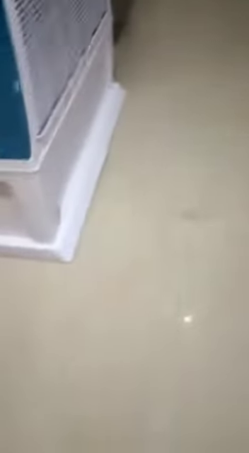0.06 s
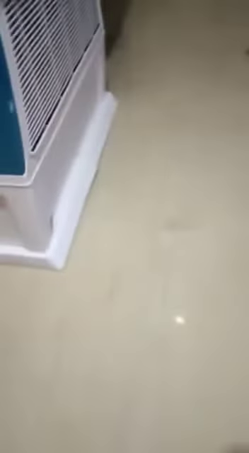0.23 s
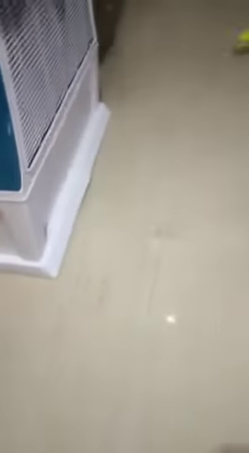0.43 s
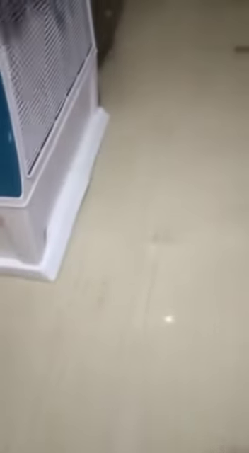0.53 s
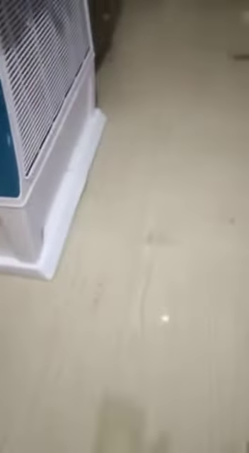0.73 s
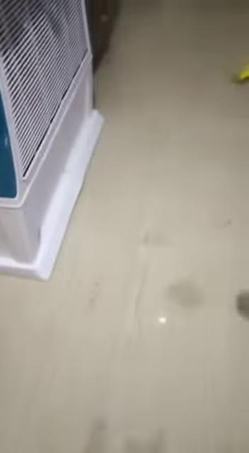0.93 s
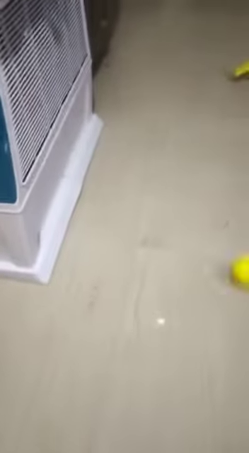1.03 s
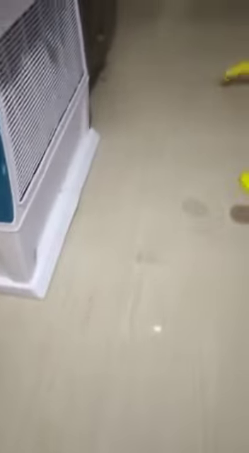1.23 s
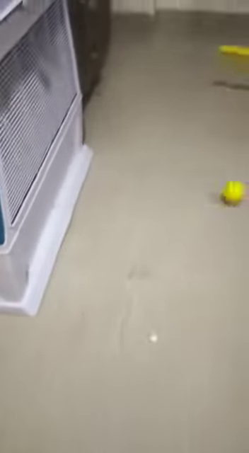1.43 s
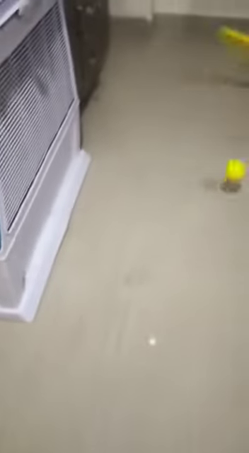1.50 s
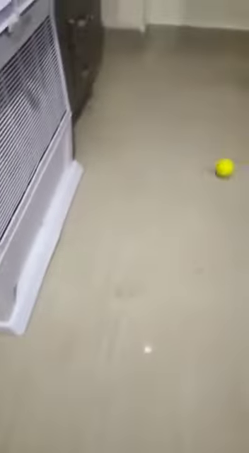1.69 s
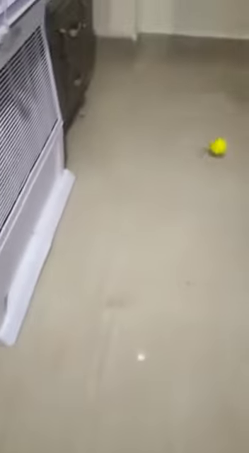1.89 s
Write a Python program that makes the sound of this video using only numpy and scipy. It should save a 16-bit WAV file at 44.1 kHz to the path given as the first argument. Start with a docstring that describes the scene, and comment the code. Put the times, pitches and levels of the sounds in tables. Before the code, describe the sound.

A ball is knocked loudly at about 0.2 and 0.9 seconds, each a sharp crack with a hollow boom ringing briefly in a bare room. A faint rustle and thin, high squeak come just before the second knock. A bright scuff and small ticks follow around 1.1 seconds. The ball bounces on the hard floor at 1.5 and 1.8 seconds, softer each time, over low room noise.

```python
"""Ball knocks in a bare room

A ball is knocked twice, loud and hollow, then bounces away twice on the hard floor. Each knock is a
crack and a short boom that the room holds; a limiter flattens its start. Between the knocks come
a soft rustle and a thin squeak, after them a bright scuff. Faint ticks sit over low room noise."""
import sys
import numpy as np
from scipy import signal
from scipy.fft import rfft, irfft
from scipy.io import wavfile
from scipy.ndimage import uniform_filter1d

SR = 44100
rng = np.random.default_rng(int(sys.argv[2]) if len(sys.argv) > 2 else 0)


def unload_audio(sound):
    """Save the sound as a 16-bit wav file, at the path given as the first command line argument."""
    columns = np.transpose(np.atleast_2d(sound))
    # keep every value between -1 and 1, then stretch to whole-number steps
    steps = np.round(np.clip(columns, -1, 1) * 32767)
    wavfile.write(sys.argv[1], SR, steps.astype(np.int16))


N = 85995
HZ, T = np.fft.rfftfreq(2 * N, 1 / SR), np.arange(N) / SR
TREBLE_SHELF = HZ ** 2 / (HZ ** 2 + 2500 ** 2)

# colour of the room tone: freq_hz, gain_db
ROOM_TONE_EQ = [(25, -20), (50, -23.5), (90, -7), (200, -7.5), (370, -0.5), (600, -11), (1200, -14),
                (2200, -22.5), (5000, -32), (10000, -34), (15500, -36.5)]
# how alike left and right are in the room: freq_hz, correlation
ROOM_CORRELATION = [(100, 0.78), (300, 0.87), (550, 0.36), (1000, -.15), (2500, 0.07), (12000, 0)]
# reverb time by band: freq_hz, t60_s
ROOM_DECAY = [(100, 0.35), (250, 0.71), (500, 0.56), (1500, 0.59), (4000, 0.54), (9000, 0.43),
              (15000, 0.36)]
# the two loud knocks: start_s, crack_gain_db, tail_gain_db, tail_treble_db
KNOCK_HITS = [(0.2080, 4, -0.5, -2.5), (0.8787, 2.5, 1.5, -2)]
# modes of the hollow boom: pitch_hz, gain_db, t60_s
BOOM_MODES = [(369, 4, 0.045), (506, -7.5, 0.03), (864, -16.5, 0.091), (1092, -13.5, 0.035),
              (1178, -21, 0.074), (1470, -8, 0.038), (1760, -41, 0.038), (2470, -45, .04),
              (2890, -18.5, 0.033)]
# colour of the crack: freq_hz, gain_db
CRACK_EQ = [(45, -40), (135, 13), (400, 9), (900, 21.5), (2000, 3), (5000, 1), (9000, -4), (13000, -4),
            (15000, -20), (16500, -26)]
# peaks and hollows shared by a knock's spike, crack and tail: centre_hz, width_hz, gain_db
KNOCK_RESONANCES = [(1183, 150, 4), (1560, 95, 5), (1810, 62, 2.5), (2010, 150, -1.5), (2510, 130, 4.5),
                    (2800, 90, -3.5), (3290, 42, 7), (3460, 75, 0.5), (3700, 130, -3), (4120, 61, -14),
                    (5260, 110, 3), (5330, 86, 2.5), (5700, 200, -7.5), (6140, 40, 9.5), (6440, 83, 8),
                    (6590, 31, 9), (7070, 140, -13), (7400, 200, -0.5), (7860, 170, -10.5), (8760, 320, 8),
                    (9270, 110, -9), (10370, 360, 4.5), (11350, 330, -13.5), (11700, 180, 2.5)]
# colour of the room's answer to a knock: freq_hz, gain_db
TAIL_EQ = [(40, -28), (90, -28), (150, -9.5), (240, -4), (340, 0), (450, -2), (700, -6.5), (1300, -5),
           (2100, -13.5), (3300, -17.5), (5200, -23.5), (7300, -24.5), (9000, -19.5), (12500, -24),
           (14500, -35), (16000, -49)]
# resonances that stand out in that answer: centre_hz, width_hz, gain_db
TAIL_RESONANCES = [(229.5, 14, 8.5), (276.4, 18.5, 6.5), (356.2, 16.4, 8.5), (479.2, 11.8, 7),
                   (584, 56, 5.5), (604, 22, 6.5), (790, 67, 7), (1007, 50, 5), (1747, 11, 8)]
# swell and fade of the rustle: time_s, level_db
RUSTLE_ENVELOPE = [(0.623, -53), (.645, -47), (.68, -51.5), (.77, -54), (.81, -59.5), (0.849, -65)]
# colour of the rustle: freq_hz, gain_db
RUSTLE_EQ = [(200, -9), (800, 10), (2000, 5.5), (3000, 1), (4500, -3), (7000, -14), (10000, -8.5),
             (15000, -31)]
# glide of the squeak: time_s, pitch_hz, level_db
SQUEAK_GLIDE = [(.635, 11400, -74), (.655, 12000, -57), (.678, 13700, -66), (.72, 14000, -62),
                (0.764, 14000, -57), (.787, 15100, -68), (.808, 12900, -57), (.835, 10900, -70)]
# faint ticks and one long scuff: start_s, level_db, pitch_hz, width_octaves, t60_s
TICK_HITS = [(0.638, -28.5, 4800, 1, 0.0071), (0.643, -26, 4780, 0.2, 0.022),
             (1.093, -13.5, 9500, 0.48, 0.44), (1.155, -24, 4700, 0.14, .012),
             (1.1603, -17, 5000, 0.16, 0.012), (1.562, -34.5, 4270, 0.38, 0.011)]
# bounces on the floor: start_s, gain_db, direct_db, treble_db
BOUNCE_HITS = [(1.475, -1.5, 0.5, -4.5), (1.769, -5.5, -8.5, -5.5)]
# colour of a bounce: freq_hz, gain_db
BOUNCE_EQ = [(60, -56), (150, -10.5), (240, -1), (400, -2), (850, -4), (1250, -3), (1900, -15.5),
             (4000, -20.5), (6500, -25), (10000, -17.5), (15500, -34)]
# resonances that stand out in a bounce: centre_hz, width_hz, gain_db
BOUNCE_RESONANCES = [(218.6, 34, 14), (514, 45, 5.5), (865, 44, 13), (1217, 62, 8)]


def amp(db):
    """Decibels to gain."""
    return 10 ** (np.asarray(db) / 20)


def curve(points, hz=HZ):
    """Reads a table on a log-frequency axis."""
    freq_hz, value = np.transpose(points)
    return np.interp(np.log(hz + 1), np.log(freq_hz), value)


def bells(table):
    """EQ curve in dB of a set of resonances."""
    return sum(db / (1 + (2 * (HZ - hz) / width) ** 2) for hz, width, db in table)


def unit(x):
    """Scales to an average energy of 1 per channel."""
    return x / np.sqrt(np.mean(np.sum(x ** 2, -1)) + 1e-20)


def decay(t60_s):
    """Exponential fade, 60 dB down after t60_s."""
    return np.exp(-np.log(1000) * T / t60_s)


def eq(x, gain_db):
    """Minimum-phase EQ: nothing rings ahead of the attack."""
    cepstrum = irfft(np.log(amp(gain_db)))
    cepstrum[1:N] *= 2
    cepstrum[N + 1:] = 0
    return irfft(rfft(x, 2 * N) * np.exp(rfft(cepstrum)))[..., :N]


def diffuse():
    """Noise from all around: alike in both ears only in the bass."""
    a, b = rfft(rng.standard_normal((2, 2 * N)))
    correlation = curve(ROOM_CORRELATION)
    mid, side = a * np.sqrt(1 + correlation), b * np.sqrt(1 - correlation)
    return irfft(np.array([mid + side, mid - side]))[:, :N]


def room_tone(level_db=-50.5):
    """A steady bed of low room noise."""
    return amp(level_db) * np.sqrt(N) * unit(eq(diffuse(), curve(ROOM_TONE_EQ)))


def knock(crack_gain_db, tail_gain_db, tail_treble_db):
    """A spike and a crack with a spray of close echoes, a hollow boom, and the room's long answer."""
    detail_db = bells(KNOCK_RESONANCES) + echo_ripple()
    crack_eq = curve(CRACK_EQ) + detail_db
    crack = unit(eq(diffuse() * decay(t60_s=.016), crack_eq))
    spray = unit(eq(diffuse() * decay(t60_s=.062), crack_eq))
    attack = amp(crack_gain_db) * (amp(2) * crack + amp(15) * spray)
    tail_eq = curve(TAIL_EQ) + bells(TAIL_RESONANCES) + detail_db + tail_treble_db * TREBLE_SHELF
    tail = amp(26.5 + tail_gain_db) * unit(eq(reverb_tail(), tail_eq))
    return amp(2) * (with_reflections(spike()) + attack + boom() + tail)


def spike(bright_hz=11000, top_hz=14000):
    """The hard, bright instant of contact."""
    tilt = (HZ + 50) / np.hypot(HZ, bright_hz) / (1 + (HZ / top_hz) ** 10)
    burst = diffuse() * decay(t60_s=.0045)
    return amp(8.5) * unit(eq(burst, 20 * np.log10(tilt) + bells(KNOCK_RESONANCES)))


def boom(hold_s=.012, left_lag_s=.00023, low_cut_hz=177):
    """The hollow ring: held for a few cycles, then dying fast; it reaches the right ear first."""
    t = np.maximum(T - np.array([[left_lag_s], [0]]), 0)
    dying_s = np.maximum(t - hold_s, 0)
    modes = sum(amp(db - 60 * dying_s / t60) * np.sin(2 * np.pi * hz * t) for hz, db, t60 in BOOM_MODES)
    return signal.sosfilt(signal.butter(4, low_cut_hz, "high", fs=SR, output="sos"), modes)


def echo_ripple(depth=.85, width_hz=75, above_hz=2200):
    """Close echoes interfere: rounded peaks and narrow dips in the treble, in dB."""
    bins = round(width_hz / HZ[1])
    paths = rng.standard_normal((2, len(HZ)))
    smoothed = uniform_filter1d(uniform_filter1d(paths, bins), bins)
    power = (smoothed ** 2).sum(0)
    ripple_db = 10 * np.log10(power / power.mean() + 1e-2)
    return depth * ripple_db * HZ ** 2 / (HZ ** 2 + above_hz ** 2)


def reverb_tail(rise_s=.0016):
    """The bare room rings on, each band dying at its own speed."""
    hz, t, bands = signal.stft(diffuse(), SR, nperseg=512)
    bands *= amp(-60 * t / curve(ROOM_DECAY, hz)[:, None])
    tail = signal.istft(bands, SR)[1][:, :N]
    return tail * (1 - np.exp(-T / rise_s))


def with_reflections(x, count=6, delay_s=(.002, .02), wet_db=-3):
    """Adds a few single echoes from the floor and nearby things."""
    taps = np.zeros((2, N))
    delays = (rng.uniform(*delay_s, (2, count)) * SR).astype(int)
    np.put_along_axis(taps, delays, rng.choice([-1., 1.], delays.shape), 1)
    return x + amp(wet_db) * signal.fftconvolve(x, unit(taps), axes=1)[:, :N]


def rustle():
    """Soft rubbing noise ahead of the second knock."""
    time_s, level_db = np.transpose(RUSTLE_ENVELOPE)
    rubbing = np.sqrt(N) * unit(eq(diffuse(), curve(RUSTLE_EQ)))
    return rubbing * np.interp(T, time_s, amp(level_db), left=0, right=0)


def squeak(width_hz=330, flutter_db=2.5, flutter_step_s=.0068):
    """A fuzzy, very high whistle that rises, holds and drops, broken up by an uneven flutter."""
    time_s, pitch_hz, level_db = np.transpose(SQUEAK_GLIDE)
    fuzz = eq(rng.standard_normal((2, N)), -20 * np.log10(1 + (2 * HZ / width_hz) ** 2))
    phase = 2 * np.pi * np.cumsum(np.interp(T, time_s, pitch_hz)) / SR
    whistle = np.sqrt(N) * unit(fuzz * np.sin(phase))
    steps_s = np.arange(0, N / SR, flutter_step_s)
    flutter = amp(flutter_db * np.interp(T, steps_s, rng.standard_normal(N)[:len(steps_s)]))
    return whistle * flutter * np.interp(T, time_s, amp(level_db), left=0, right=0)


def tick(level_db, pitch_hz, width_octaves, t60_s):
    """A small bright contact with one broad resonance; a long decay makes it a scuff."""
    resonance = np.exp(-(np.log2((HZ + 1) / pitch_hz) / width_octaves) ** 2)
    body = amp(-26) / (1 + (HZ / 9000) ** 2)
    contact = unit(diffuse() * decay(t60_s)) + amp(-13) * unit(reverb_tail())
    return amp(level_db) * unit(eq(contact, 20 * np.log10(resonance + body)))


def bounce(gain_db, direct_db, treble_db):
    """The ball taps the floor: one click, a cluster of early reflections and the room's tail."""
    colour_db = curve(BOUNCE_EQ) + bells(BOUNCE_RESONANCES) + treble_db * TREBLE_SHELF
    click = amp(-12 + direct_db) * (T == 0)
    early = amp(-8 + direct_db / 2) * unit(diffuse() * decay(t60_s=.33))
    tail = amp(-10) * unit(reverb_tail())
    eq_rms = np.sqrt(np.mean(amp(colour_db) ** 2))
    return amp(gain_db) * eq(click + early + tail, colour_db) / eq_rms


def scene():
    """Lays the knocks, bounces and small noises over the room tone."""
    mix = room_tone() + squeak() + rustle()
    for source, hits in (knock, KNOCK_HITS), (bounce, BOUNCE_HITS), (tick, TICK_HITS):
        for start_s, *settings in hits:
            start = round(start_s * SR)
            mix[:, start:] += source(*settings)[:, :N - start]
    return mix


def record(dry):
    """A fast limiter with slow release, soft clipping of what gets past it, then low and high cuts."""
    threshold_db, window_s, release_db_per_s = -8.5, .005, 86
    ceiling, low_cut_hz, high_cut_hz = .8, 45, 16300
    window = round(window_s * SR)
    power = abs(uniform_filter1d((dry ** 2).mean(0), window))
    over_db = np.maximum(10 * np.log10(power + 1e-12) - threshold_db, 0)
    release_db = T * release_db_per_s
    reduction_db = np.maximum.accumulate(over_db + release_db) - release_db
    ducked = dry * amp(-uniform_filter1d(reduction_db, window))
    clipped = ducked / (1 + (ducked / ceiling) ** 4) ** .25
    low_cut = signal.butter(2, low_cut_hz, "high", fs=SR, output="sos")
    high_cut = signal.firwin(255, high_cut_hz, window=("kaiser", 9), fs=SR)
    return signal.oaconvolve(signal.sosfilt(low_cut, clipped), high_cut[None], "same")


dry = scene()
out = record(dry)
unload_audio(out)
```